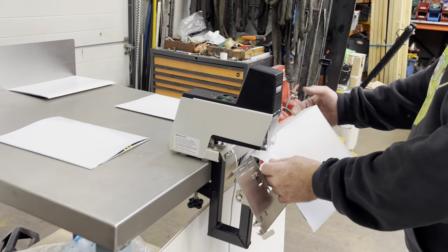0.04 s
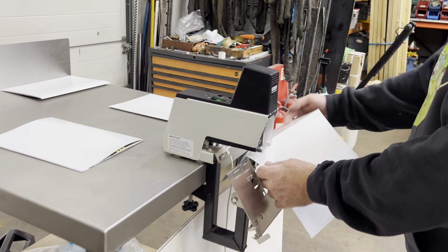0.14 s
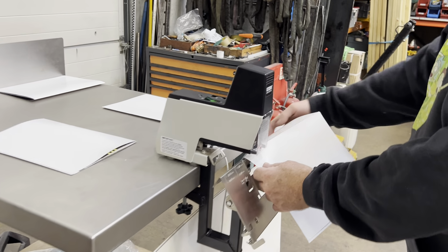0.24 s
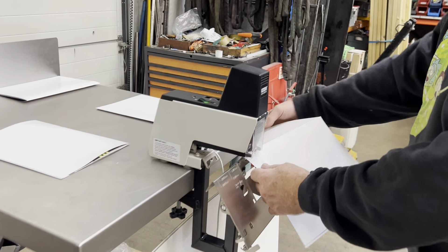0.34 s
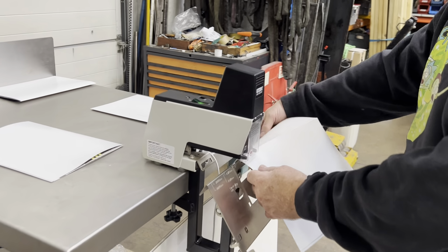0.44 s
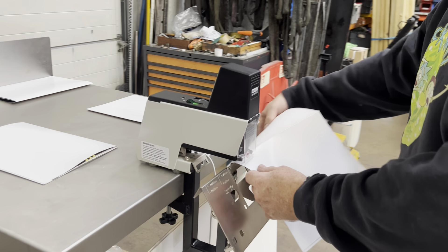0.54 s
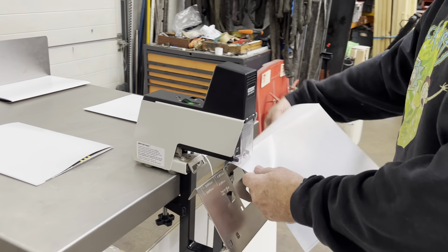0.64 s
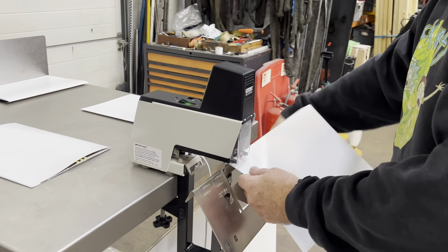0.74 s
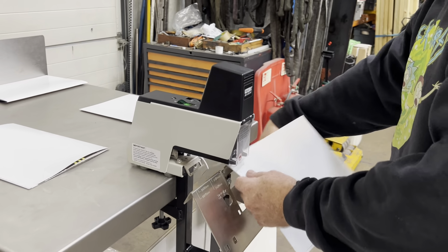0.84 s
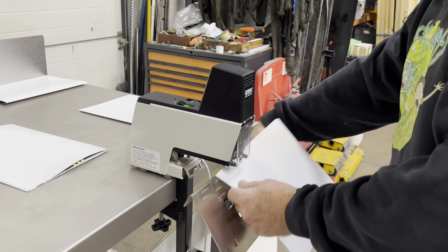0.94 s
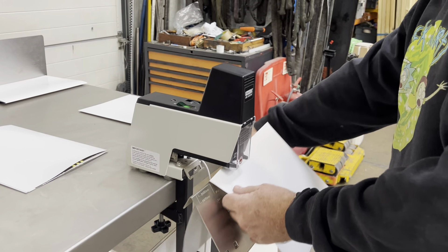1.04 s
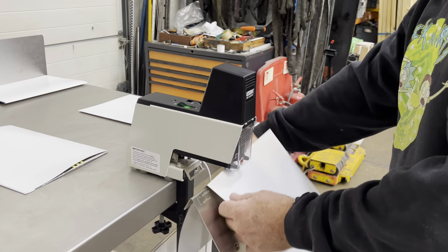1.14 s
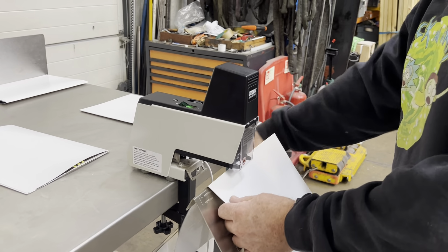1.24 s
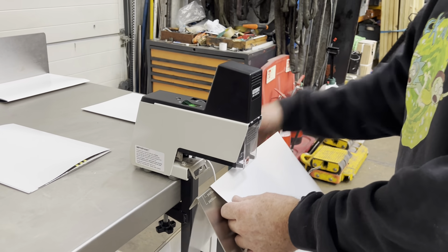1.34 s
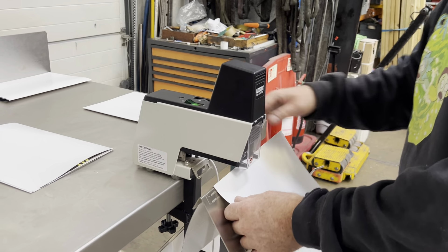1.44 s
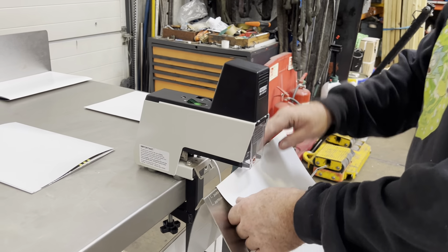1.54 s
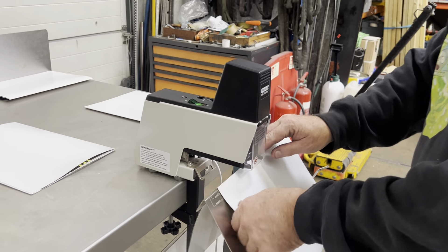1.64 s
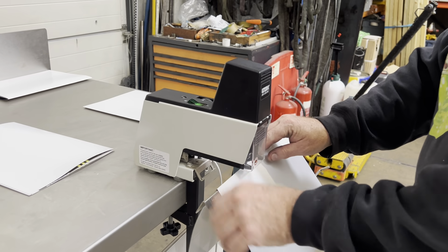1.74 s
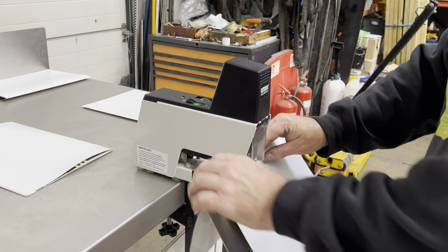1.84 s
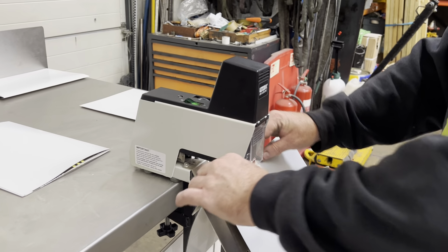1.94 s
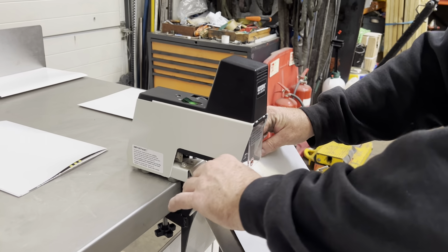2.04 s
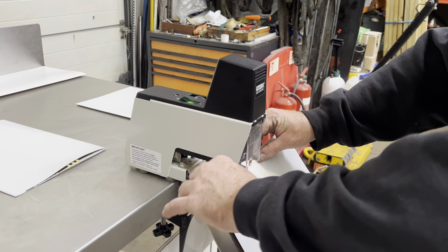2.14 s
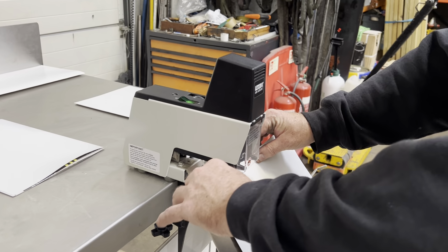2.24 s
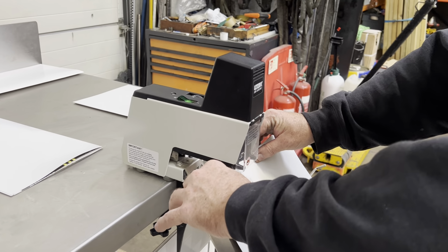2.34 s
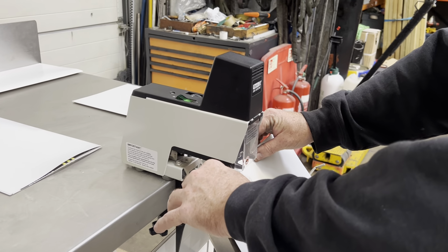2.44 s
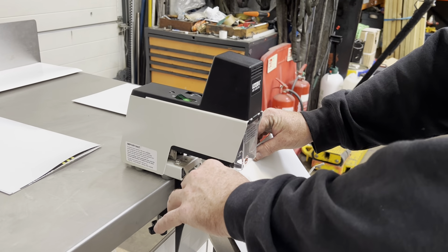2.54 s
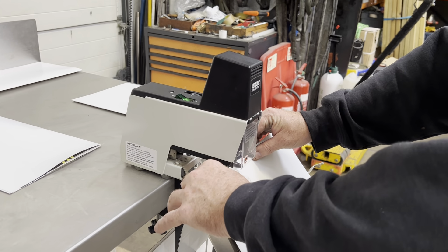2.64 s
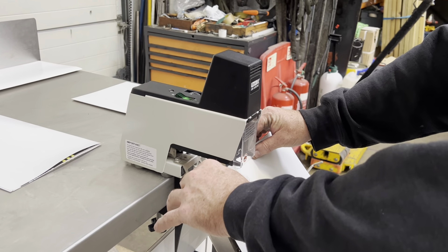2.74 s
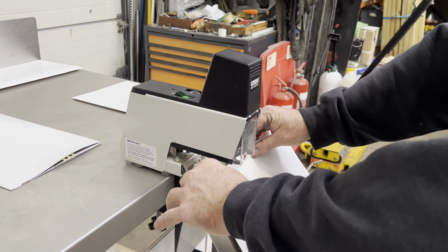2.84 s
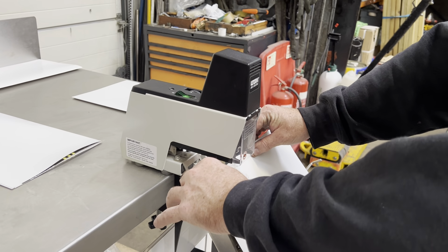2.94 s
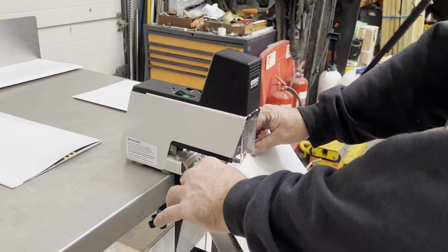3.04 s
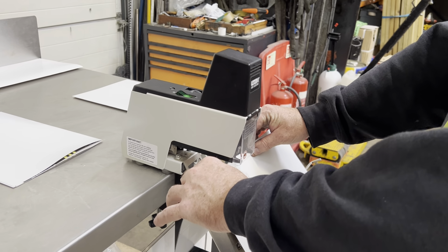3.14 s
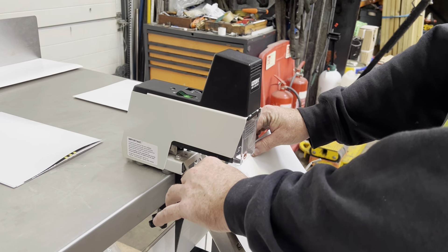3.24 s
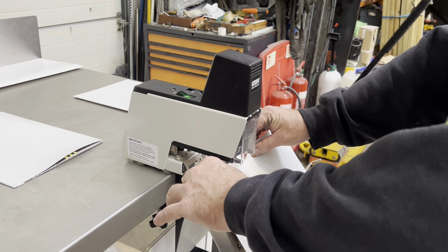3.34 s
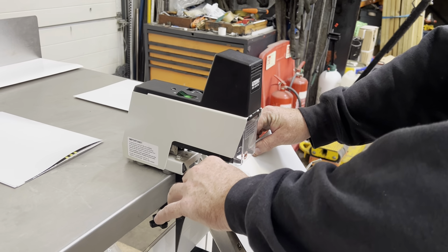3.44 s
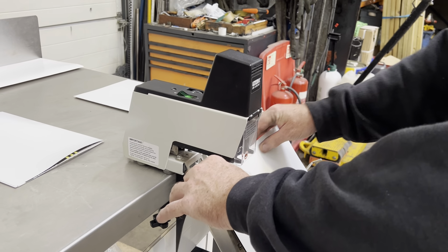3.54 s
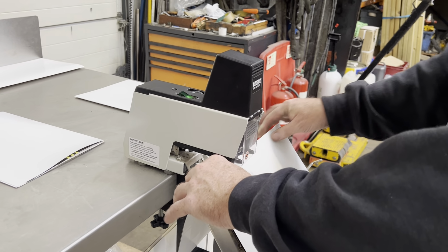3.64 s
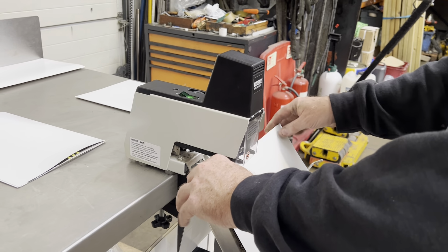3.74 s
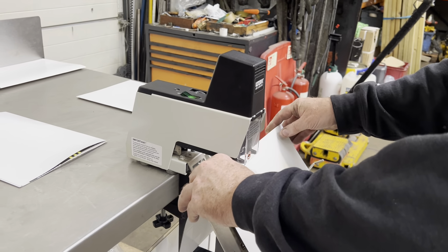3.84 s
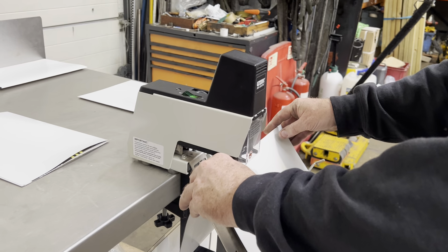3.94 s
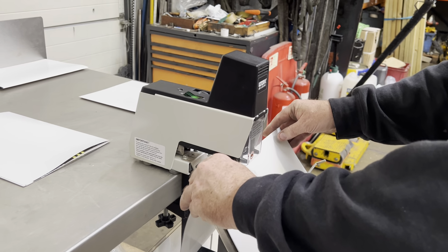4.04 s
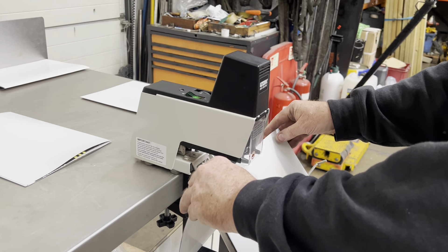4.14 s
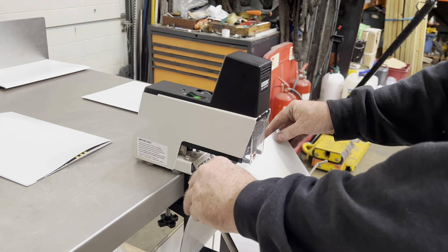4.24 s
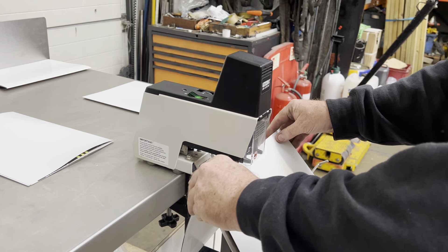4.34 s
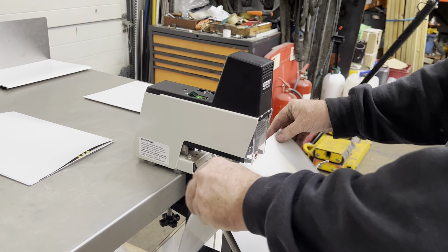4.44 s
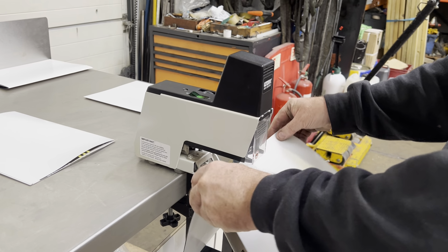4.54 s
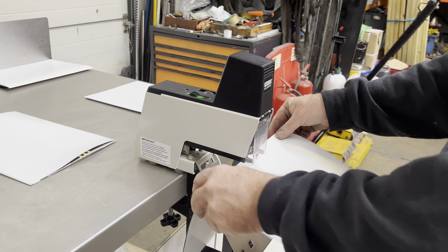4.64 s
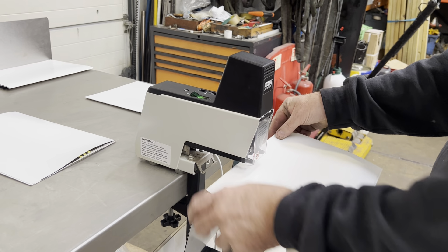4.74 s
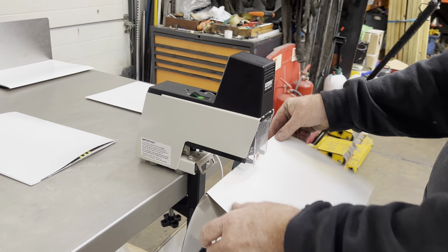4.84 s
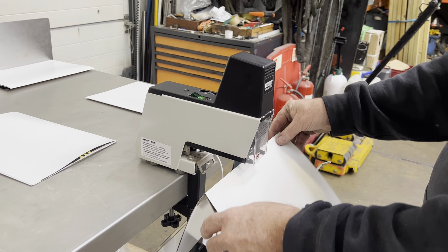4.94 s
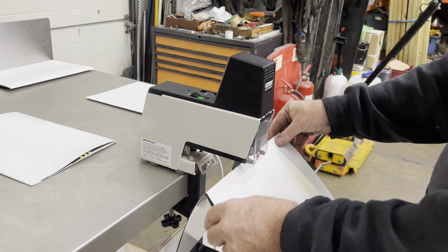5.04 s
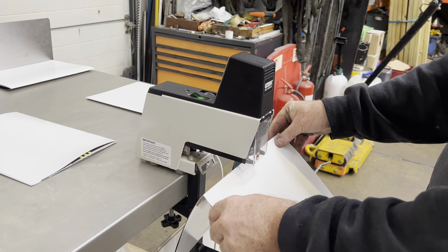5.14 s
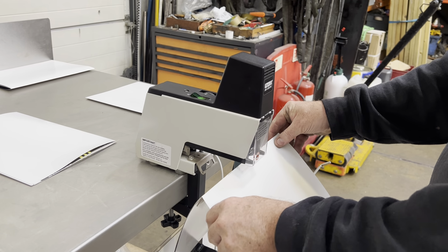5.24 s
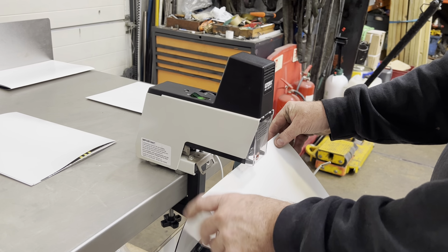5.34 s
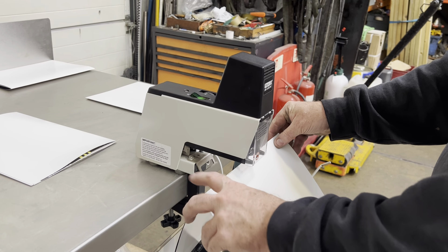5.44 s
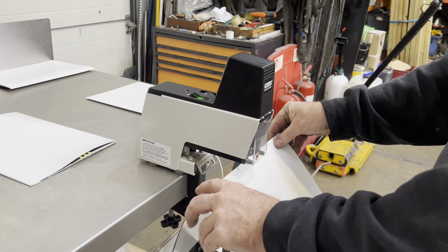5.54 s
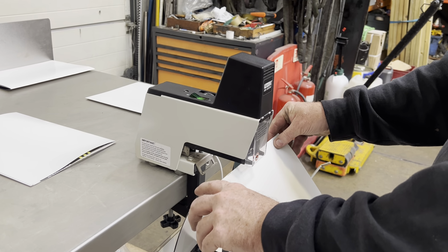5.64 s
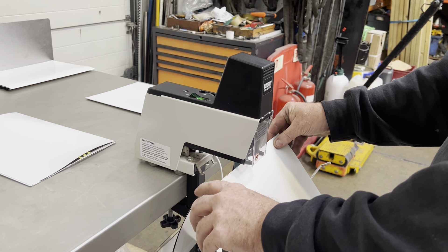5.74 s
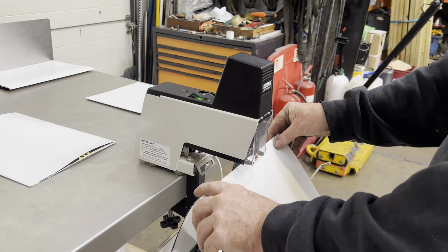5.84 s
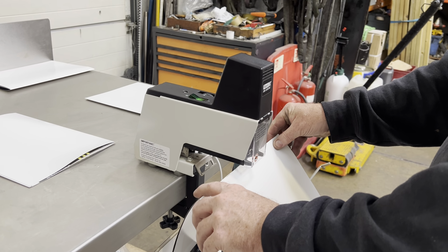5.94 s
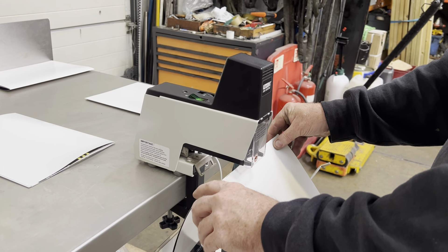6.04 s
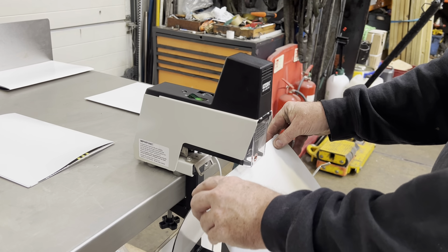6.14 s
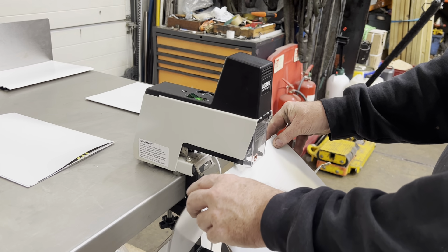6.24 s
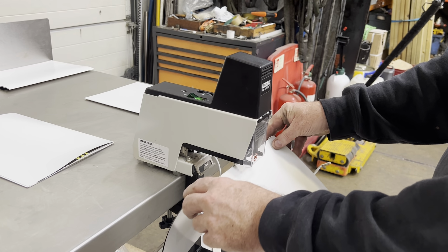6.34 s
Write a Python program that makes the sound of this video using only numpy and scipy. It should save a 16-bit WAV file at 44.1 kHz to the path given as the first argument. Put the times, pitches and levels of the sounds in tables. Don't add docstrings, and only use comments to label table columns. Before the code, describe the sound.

Phone-like stereo pickup about a metre away: hissing sheets, dull knocks and dry finger raps over a low, distant fan. After a lull comes a crisp switch click and a violent, rattling solenoid blow, far louder than everything else. Its reverberation spreads through the hall while the bench hum is damped. Hands shuffle paper lightly, tap a little, and a second click and slam end the scene.

```python
import sys
import numpy as np
from scipy import signal
from scipy.fft import rfft, irfft
from scipy.io import wavfile
from scipy.ndimage import uniform_filter1d

SR = 44100
rng = np.random.default_rng(int(sys.argv[2]) if len(sys.argv) > 2 else 0)


def materialize(psi):
    bounded = np.clip(np.atleast_2d(psi).T, -1, 1)
    quanta = np.round(bounded * 32767).astype(np.int16)
    wavfile.write(sys.argv[1], SR, quanta)


def gain_from_decibels(decibels):
    exponent = np.asarray(decibels, float) / 20
    return 10 ** exponent


N = 281358

# frequency in Hz, level in dB per Hz.
FAN_SPECTRUM = [(15, -39.5), (25, -19.5), (59, -3.5), (135, -12.5), (293, -18.5), (373, -22.5),
                (655, -24.5), (749, -22.5), (1340, -14), (1800, -35.5), (2370, -39.5), (3010, -51),
                (5010, -52), (9770, -83), (15000, -64)]
FAN_DB = -51

# frequency in Hz, level in dB, decay time t60 in seconds.
HALL_DECAY = [(101, 5, 0.6), (306, -3, 1.2), (680, 1.5, 1.79), (1500, 3.5, 2.06), (3000, -3, 1.89),
              (5000, -2, 1.58), (8000, 1, 1.01), (11000, -3.5, 0.66), (16690, -3.5, 0.35)]
HALL_DB, EARLY_DB, EARLY_T60_S = -12.5, -7, 0.063
HANDS_EARLY_DB, HANDS_HALL_DB = -4, -1

# start in seconds, length in seconds, level in dB.
RUMBLES = [
    (0.05, 0.044, -51),
    (0.13, 0.14, -42.5),
    (0.46, 0.12, -37),
    (0.6, 0.33, -46.5),
    (0.99, 0.58, -45),
    (1.44, 0.76, -49),
    (2.05, 0.45, -47.5),
]
RUMBLE_RISE_DB_S, RUMBLE_FALL_DB = 170, 32.5

# grip in seconds, length in seconds, level in dB, brightness in dB.
SLIDES = [(0.015, 1.4, -58, -7), (0.032, 0.037, -49, -4), (0.123, 0.042, -53.5, -8),
          (0.382, 0.043, -68, -16), (0.439, 0.042, -60, -8), (0.606, 0.04, -52.5, -12),
          (0.721, 0.022, -48, -18), (0.764, 0.007, -43, -19), (0.918, 0.096, -43.5, -9.5),
          (1.223, 0.034, -56, -10), (1.354, 0.17, -87, 15), (1.548, 0.091, -66, -5), (1.657, 0.12, -57, -3),
          (1.95, 0.36, -71.5, 0), (2.239, 0.37, -63, -7), (2.699, 0.35, -63.5, -9),
          (3.025, 0.082, -64.5, -14), (3.56, 0.11, -62, 7.5), (3.901, 0.16, -67, -2),
          (4.06, 0.11, -61.5, -1.5), (4.373, 0.34, -73, -10.5), (4.57, 0.053, -64, -7),
          (4.81, .12, -66, -2), (4.964, .06, -66, -3), (5.133, .2, -81, 1.5), (5.54, .05, -64, -9),
          (5.6, 0.31, -65, -21), (5.692, 0.018, -84, -13)]
SLIDE_RISE_DB_S, SLIDE_FALL_DB = 394.5, 21

# start in seconds, length in seconds, level in dB.
FLEXES = [
    (0.045, 0.041, -35),
    (0.1, 0.85, -51),
    (0.39, 0.017, -33),
    (0.445, 0.085, -37.5),
    (0.6, 0.083, -39.5),
    (0.715, 0.067, -31.5),
    (0.9, 0.079, -41.5),
    (0.98, .06, -36.5),
    (1.2, 0.078, -43.5),
    (1.408, 0.054, -53),
]
FLEX_RISE_DB_S, FLEX_FALL_DB = 300, 21.5

# time in seconds, peak in dB, pitch in Hz, click in dB.
TICK_EVENTS = [(0.374, -52.5, 2550, 2.5), (0.4498, -53.5, 2730, 7.5), (0.4738, -48, 2740, -16),
               (0.5157, -50, 3920, 5), (0.6444, -53, 3200, 11.5), (0.7036, -38, 3840, -9),
               (0.7222, -29, 3060, -9), (0.7284, -34, 3000, -22), (0.753, -35, 2500, -11.5),
               (0.825, -43.5, 2620, -8), (0.8909, -41, 3000, -12), (0.9754, -40.5, 2380, -3.5),
               (1.2012, -39.5, 4120, -1.5), (1.2244, -51, 3240, 0), (1.5264, -59.5, 2920, -4),
               (1.6367, -59, 2240, 5), (1.7434, -55, 2230, -1), (1.9395, -61.5, 4500, 4),
               (5.15, -69, 5000, -12.5), (2.2583, -57, 2700, -2.5), (3.0165, -50.5, 4240, -6),
               (3.3294, -30, 7700, -12.5), (4.0044, -52.5, 2670, -1), (4.36, -52.5, 2400, -12),
               (4.593, -58, 2710, -1), (4.793, -62, 3000, -3), (4.9104, -64.5, 4100, 2),
               (5.5129, -57.5, 2760, 2), (5.5525, -48, 2300, -4), (5.6855, -57, 4170, -9)]
TICK_T60_S = 0.021

# time in seconds, peak in dB, pitch in Hz, click in dB.
KNOCK_EVENTS = [(0.05, -50, 215, -27), (0.384, -46, 543, -4), (0.438, -39.5, 550, -15),
                (0.452, -40.5, 375, -4.5), (0.463, -44, 940, -23), (0.723, -34, 1777, -1.5),
                (0.978, -37.5, 208, 0), (0.992, -40, 238, -7), (1.202, -45, 297, -3.5),
                (1.406, -43, 283, -3), (2.035, -52, 226, -14.5), (2.111, -49, 1258, -28.5),
                (4.606, -43.5, 389, -9.5), (4.796, -45, 264.7, -15), (5.517, -49.5, 446, -11),
                (5.553, -36, 543, -13), (5.556, -34.5, 603, -18), (5.616, -43.5, 630, -14)]
KNOCK_T60_S = 0.083

# time in seconds, peak in dB, pitch in Hz, click in dB.
RAP_EVENTS = [
    (0.722, -27, 997, -18),
    (2.1955, -32, 620, -17),
    (4.597, -43, 750, 3),
]
RAP_T60_S = 0.022

# time in seconds, snap in dB, case in dB, top frequency in Hz.
SWITCH_EVENTS = [
    (3.0635, -21, -27.5, 14000),
    (3.0672, -17, -18, 5000),
    (3.082, -53, -35, 4033),
    (5.7465, -21, -17, 13000),
    (5.749, -19.5, -29, 4500),
    (5.7805, -62, -25.5, 3000),
]
# frequency in Hz, level in dB, t60 in seconds.
SNAP_MODES = [(2090, -15, 0.024), (2500, 8.5, 0.0014), (4030, -4.5, 0.0025), (7900, -3.5, .002)]
# frequency in Hz, level in dB, t60 in seconds.
CASE_MODES = [(566, -3, 0.029), (730.6, -13, .012)]

# frequency in Hz, level in dB, t60 in seconds.
BENCH_MODES = [(84, -4.5, 1.7), (117.7, -5.5, 5.4), (184, -1.5, 1.63), (265.8, -1.5, 2.17),
               (299, -5.5, 0.98), (369, -13, 2.6), (412, -9, 2.8), (443, -7.5, 1.7), (635, -16, 0.47),
               (727, -5.5, 1.3), (770, -8.5, 0.63), (968, -7.5, 2.7)]
BENCH_MUTED_S = 4.1
# frequency in Hz, width in Hz, level in dB.
CLAMP_MODES = [(242, 46, -6.5), (287, 65, -12), (470, 69, 1), (573, 78, 0), (620, 91, -6.5),
               (800, 66, -0.5), (960, 110, 0)]

# start of the driver in seconds, level in dB.
SHOT_EVENTS = [
    (3.120, 0.5),
    (5.8, 0.5),
]
# ms after the start, force in dB, contact time in ms, crack in dB.
CONTACTS = [(1.228, -29.5, 0.11, -43), (4.573, -26, .05, -38.5), (8.2, -27.5, 0.32, -40.5),
            (11.5, -11.5, 0.066, -15.5), (13.9, -12, 0.49, -32.5), (17.72, -10.5, 0.34, -33.5),
            (20.48, -13.5, 0.1, -28), (23.3, -17, 0.038, -9.5), (26.11, -15, 0.042, -37.5),
            (34.7, -24, 0.34, -34), (37.8, -11.5, 0.92, -15), (49.6, -22, 0.19, -33.5),
            (58.8, -14.5, 0.047, -37.5), (65, -22.5, 0.35, -41), (76.65, -37, .6, -37.5),
            (94.8, -37, 0.17, -41.5)]
# frequency in Hz, level in dB, t60 in seconds.
HOUSING_MODES = [(150, -28, 0.033), (310, -11.5, 0.12), (556, 0.5, 0.04), (960, 6, 0.029),
                 (1584, 1.5, 0.061), (2250, -5, 0.051), (2960, -2, 0.095), (5000, -17.5, 0.059),
                 (9050, -9.5, 0.039), (14000, -9, 0.0033)]
# frequency in Hz, level in dB.
RADIATED_POWER = [(80, -13.5), (200, 11), (500, 5.5), (1000, 2), (2000, -2.5), (3200, -0.5), (5000, -6),
                  (8000, -13), (12000, -10.5), (16000, -13.5)]
# peak in dB, pitch in Hz, click in dB.
PLUNGER_PING = (-27, 3740, -11.5)
PLUNGER_T60_S, PLUNGER_LAG_S = 0.025, 0.0052

# frequency in Hz, correlation from -1 to 1.
CORRELATION = [(60, 1), (200, 0.89), (640, 0.57), (1400, -0.22), (2100, 0.71), (3400, 0.25), (5500, 0.31),
               (7000, 0.51), (10000, .93), (15000, -0.71)]
# frequency in Hz, left minus right in dB.
PORT_BALANCE = [(60, 1.5), (110, -0.5), (200, -1.5), (380, -1), (700, 2), (1290, -1), (2380, 3),
                (4400, 3.0), (8120, 1.5), (15000, -2.5)]
PORT_LAG_S, PORT_FROM_HZ, PORT_FULL_HZ = 6.75 / SR, 5200, 6400
LIMIT_DB, LIMIT_SHARE, LIMIT_S = -8.5, 0.25, 0.006


def on_log(hz, table, column=1):
    table = np.array(table, float)
    return np.interp(np.log(np.maximum(hz, 1)), np.log(table[:, 0]), table[:, column])


def unit(x):
    return x / np.sqrt(np.mean(x ** 2))


def ring(modes, seconds):
    hz, db, t60 = np.array(modes, float).T[:, :, None]
    t = np.arange(int(seconds * SR)) / SR
    return (gain_from_decibels(db - 60 * t / t60) * np.sin(2 * np.pi * hz * t)).sum(axis=0)


def add(track, s, sound):
    i = int(s * SR)
    track[i:i + len(sound)] += sound[:N - i]


def band(x, lo_hz, hi_hz):
    return signal.sosfilt(signal.butter(2, [lo_hz, min(hi_hz, 0.45 * SR)], "band", fs=SR, output="sos"), x)


def walk(rate):
    k = int(SR / rate)
    held = np.repeat(rng.standard_normal(N // k + 1), k)
    return 0.27 * uniform_filter1d(uniform_filter1d(held, k), k)[:N]


def gestures(rows, rise_db_s, fall_db):
    s, length, db = np.array(rows, float).T[:3, :, None]
    since = np.arange(0, N, 32) / SR - s
    fall = fall_db * (since / np.maximum(length, 0.01)) ** 2
    shape = gain_from_decibels(db - np.where(since < 0, -since * rise_db_s, fall))
    return np.repeat(shape, 32, axis=1)[:, :N]


def fan():
    hz = np.fft.rfftfreq(N, 1 / SR)
    air = rfft(rng.standard_normal((2, N))) * gain_from_decibels(on_log(hz, FAN_SPECTRUM)) * (hz > 20)
    out, swell = 0, walk(0.25)
    for centre_hz in 25 * 2 ** np.arange(0, 10, 0.5):
        share = np.maximum(1 - np.abs(2 * np.log2((hz + 1) / centre_hz)), 0)
        out = out + irfft(air * share, N) * gain_from_decibels(0.27 * swell + 3.6 * walk(5.4))
    return unit(out) * gain_from_decibels(FAN_DB)


def hall():
    hz, t, z = signal.stft(rng.standard_normal((2, 2 * SR)), SR, nperseg=256)
    z = z * gain_from_decibels(on_log(hz, HALL_DECAY)[:, None] - 60 * t / on_log(hz, HALL_DECAY, 2)[:, None])
    tail = signal.istft(z, SR, nperseg=256)[1]
    t = np.arange(tail.shape[1]) / SR
    tail = tail * (1 - np.exp(-t / 0.0097))
    early = band(rng.standard_normal(tail.shape), 87, 12000)
    early = early * gain_from_decibels(-60 * t / EARLY_T60_S) * (t > 0.0012)
    return gain_from_decibels(EARLY_DB) * early / np.linalg.norm(early[0]), gain_from_decibels(HALL_DB) * tail / np.linalg.norm(tail[0])


def rumble():
    level = gestures(RUMBLES, RUMBLE_RISE_DB_S, RUMBLE_FALL_DB).sum(axis=0) * gain_from_decibels(-5.5)
    return level * unit(band(rng.standard_normal(N), 69, 182))


def paper():
    slips = gain_from_decibels(4.7 * rng.exponential(size=N)) * (rng.random(N) < 0.012)
    grain = 1 + 2.8 * uniform_filter1d(slips, 30)
    rub = unit(rng.standard_normal(N) * grain) * gain_from_decibels(7.5 * walk(60))
    slides = gestures(SLIDES, SLIDE_RISE_DB_S, SLIDE_FALL_DB) * gain_from_decibels(-4)
    bright = gain_from_decibels(np.array(SLIDES)[:, 3] + 0.5) @ slides
    flex = gestures(FLEXES, FLEX_RISE_DB_S, FLEX_FALL_DB).sum(axis=0) * gain_from_decibels(-10)
    edge = unit(band(rub, 4500, 9000)) + gain_from_decibels(-1) * unit(band(rub, 10500, 15000))
    hiss = slides.sum(axis=0) * unit(band(rub, 1900, 5200))
    return hiss + bright * edge + flex * unit(band(rub, 250, 2000))


def taps(events, t60, low, high):
    out, t = np.zeros(N), np.arange(SR // 10) / SR
    onset = 1 - np.exp(-t / 0.00018)
    for s, db, hz, click_db in events:
        spread = gain_from_decibels(0.23 * rng.standard_normal(3))
        neighbours = [(min(hz * k, 15000), -9, 0.16 * t60) for k in spread]
        tone = ring([(hz, -3, t60)] + neighbours, 1 / 10)
        click = unit(band(rng.standard_normal(len(t)), low * hz, high * hz)) * gain_from_decibels(click_db - 60 * t / t60)
        add(out, s, gain_from_decibels(db + 3) * (tone + click) * onset)
    return out


def switch():
    out, t = np.zeros(N), np.arange(400) / SR
    for s, snap_db, case_db, top_hz in SWITCH_EVENTS:
        chatter = unit(np.exp(-t / 0.0015) * rng.standard_normal(400)) / 20
        add(out, s, gain_from_decibels(snap_db) * signal.fftconvolve(chatter, ring(SNAP_MODES, 0.04)))
        add(out, s, gain_from_decibels(snap_db + 11.5) * band(chatter, 1700, top_hz))
        add(out, s, gain_from_decibels(case_db) * band(ring(CASE_MODES, 0.06), 430, 1500))
    return out


def bench():
    out, t = np.zeros(N), np.arange(2 * SR) / SR
    clamp = band(ring([(hz, db, 0.75 / width_hz) for hz, width_hz, db in CLAMP_MODES], 1 / 8), 260, 2200)
    twins = [(hz + 5 + 0.024 * hz, db - 4.5, 0.63 * t60) for hz, db, t60 in BENCH_MODES]
    for s, shot_db in SHOT_EVENTS:
        swell = 1 - (1 + t / 0.02) * np.exp(-t / 0.0088)
        muted = gain_from_decibels(-60 * np.maximum(s + t - BENCH_MUTED_S, 0) / 0.5) if s < BENCH_MUTED_S else 1
        hum = ring(list(BENCH_MODES) + twins, 2)
        add(out, s + 0.013, gain_from_decibels(shot_db - 31) * hum * swell * muted)
        shake = (t / 0.016 * np.exp(-t / 0.034) * rng.standard_normal(len(t)))[:SR // 4]
        add(out, s + 0.008, gain_from_decibels(shot_db - 46) * signal.fftconvolve(shake, clamp))
    return out


def stapler():
    mode_hz = 140 + 15400 * np.linspace(0, 1, 240) ** 2
    t = np.arange(SR // 8) / SR
    modes = np.array([ring([(f, on_log(f, HOUSING_MODES), on_log(f, HOUSING_MODES, 2))], 1 / 8)
                      for f in mode_hz])
    struck = band(rng.standard_normal((len(CONTACTS), 240)) @ modes, 340, 15000)
    struck = struck / np.linalg.norm(struck, axis=1, keepdims=True)
    near, far = np.zeros((2, N))
    colour = gain_from_decibels(on_log(np.fft.rfftfreq(1024, 1 / SR), RADIATED_POWER))
    for s, shot_db in SHOT_EVENTS:
        crack = np.zeros(len(t))
        for (ms, force_db, contact_ms, crack_db), body in zip(CONTACTS, struck):
            age = np.maximum(t * 1000 - ms, 0)
            push = age * np.exp(-age / contact_ms)
            chatter = gain_from_decibels(-17.5) * (age > 0) * np.exp(-age / 2.17) * rng.standard_normal(len(t))
            force = push / push.sum() + chatter
            add(near, s, gain_from_decibels(shot_db + force_db + 21.5) * signal.fftconvolve(force, body))
            crack += gain_from_decibels(crack_db) * (age > 0) * np.exp(-age / 1.8)
        add(near, s, gain_from_decibels(shot_db) * crack * unit(band(rng.standard_normal(len(t)), 4500, 13000)))
        add(far, s + 0.012, gain_from_decibels(shot_db + 25) * np.roll(irfft(colour), 512))
    return near, far


def scene():
    blow, far_blow = stapler()
    small = switch() + taps(TICK_EVENTS, TICK_T60_S, 0.15, 10)
    small = small + taps(KNOCK_EVENTS, KNOCK_T60_S, 1, 2.6) + paper()
    small = small + taps(RAP_EVENTS, RAP_T60_S, 0.5, 1.8)
    pings = [(s + PLUNGER_LAG_S, *PLUNGER_PING) for s, _ in SHOT_EVENTS]
    blow = blow + taps(pings, PLUNGER_T60_S, 0.7, 2.2)
    early, tail = hall()
    early[1] *= gain_from_decibels(4)
    to_walls = gain_from_decibels(HANDS_EARLY_DB) * small + blow
    to_hall = gain_from_decibels(HANDS_HALL_DB) * small + far_blow
    field = signal.fftconvolve(to_walls[None], early, axes=1)
    field = field + signal.fftconvolve(to_hall[None], tail, axes=1)
    field = field[:, :N] + fan()
    field += (bench() + rumble()) * np.array([[1], [0.9]])
    field[0] += small + blow
    return field


def top_cut(x):
    return signal.sosfilt(signal.butter(12, 16530, fs=SR, output="sos"), x)


def record(dry):
    hz = np.fft.rfftfreq(N, 1 / SR)
    like = np.clip(on_log(hz, CORRELATION), -0.99, 0.99)
    height = np.sqrt(uniform_filter1d(dry[0] ** 2, int(LIMIT_S * SR)) * 2 + 1e-12)
    dry = dry * np.minimum(gain_from_decibels(LIMIT_DB) / height, 1) ** LIMIT_SHARE
    common, other = rfft(dry) * gain_from_decibels(-60 * np.clip((hz - 15600) / 1500, 0, 1))
    mid = common * np.sqrt((1 + like) / 2)
    side = other * np.sqrt((1 - like) / 2)
    treble = np.clip((hz - PORT_FROM_HZ) / (PORT_FULL_HZ - PORT_FROM_HZ), 0, 1)
    lag = 1 - treble + treble * np.exp(-2j * np.pi * hz * PORT_LAG_S)
    tilt = gain_from_decibels(on_log(hz, PORT_BALANCE) / 2)
    mix = irfft(np.array([(mid + side) * tilt * lag, (mid - side) / tilt]), N)
    return top_cut(mix)


dry = scene()
out = record(dry)
materialize(out)
```